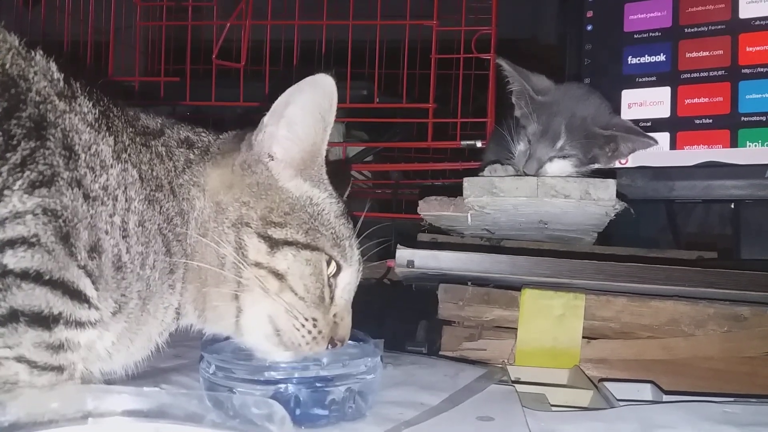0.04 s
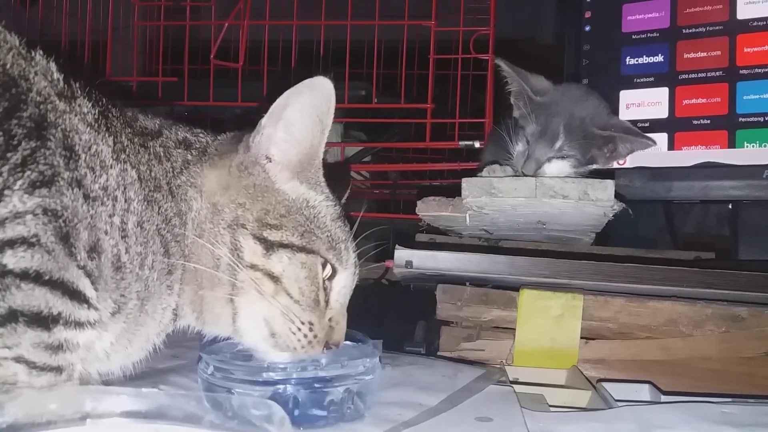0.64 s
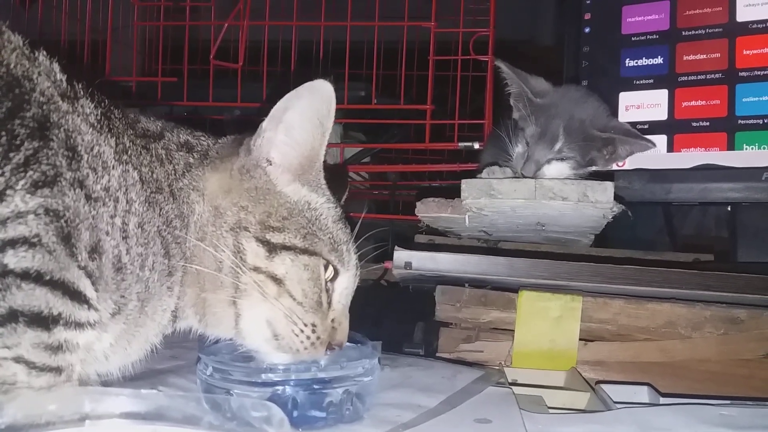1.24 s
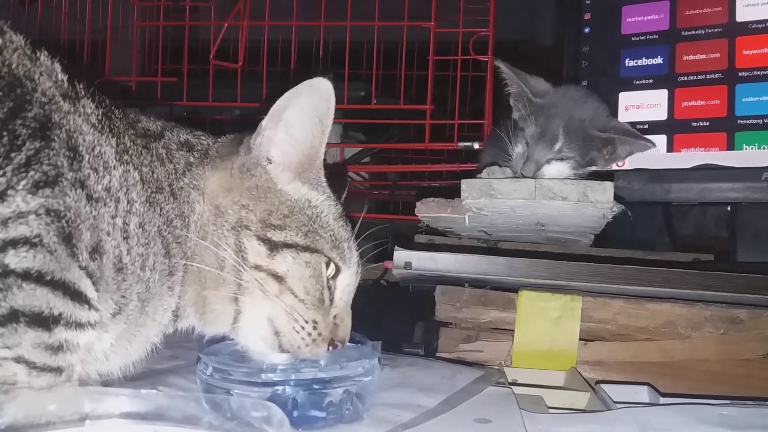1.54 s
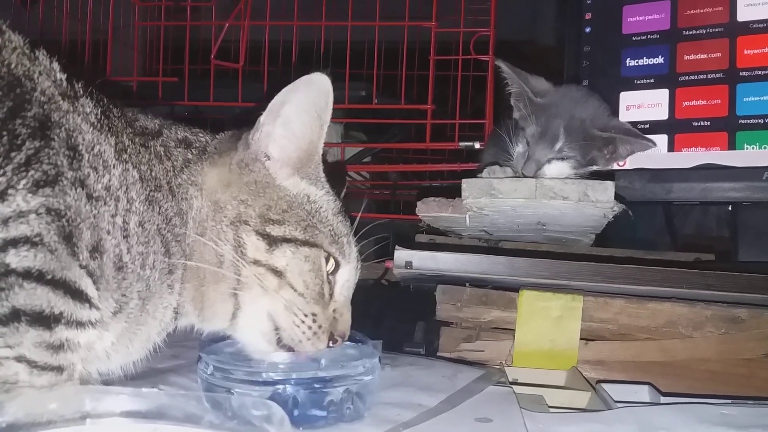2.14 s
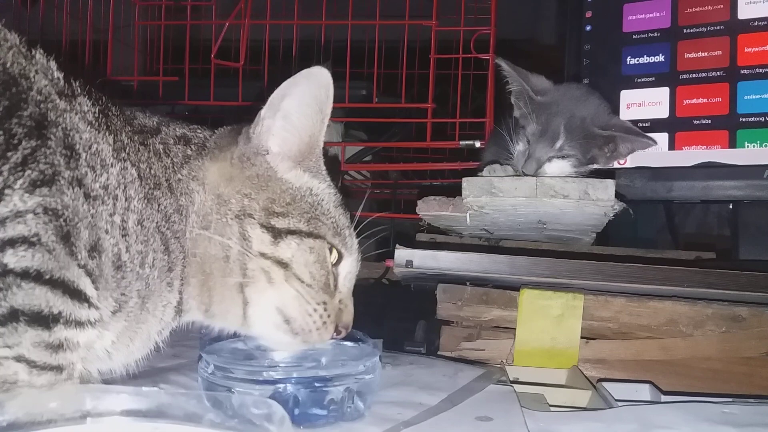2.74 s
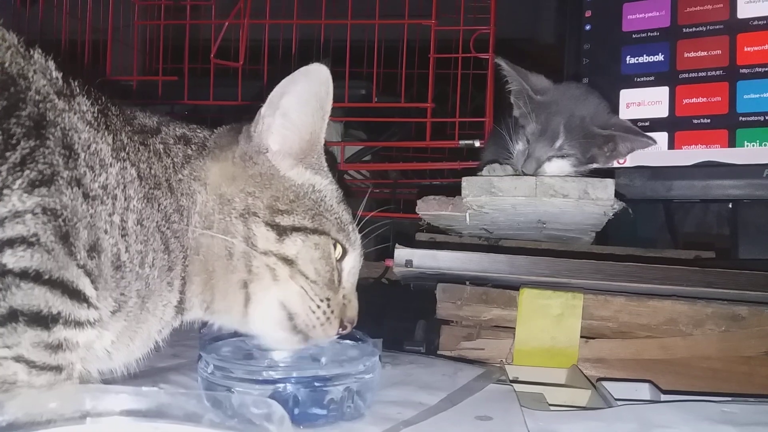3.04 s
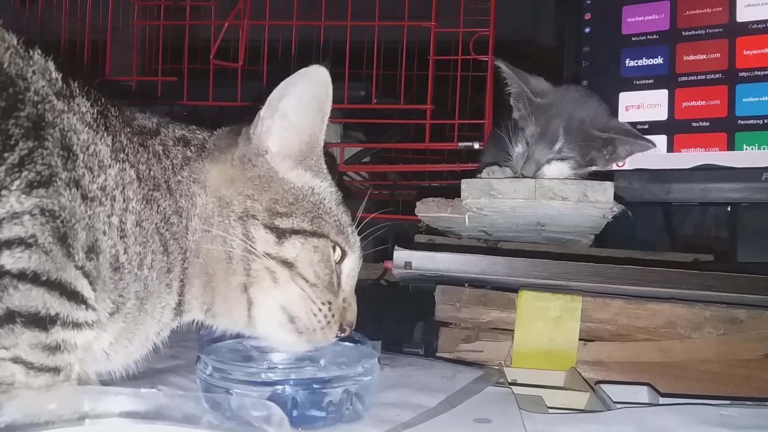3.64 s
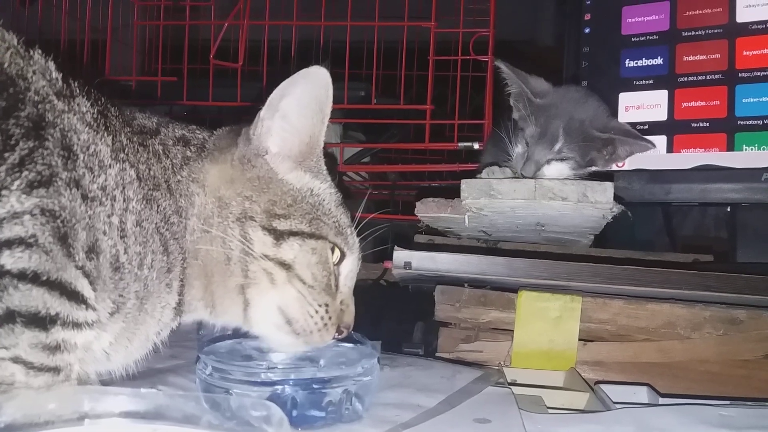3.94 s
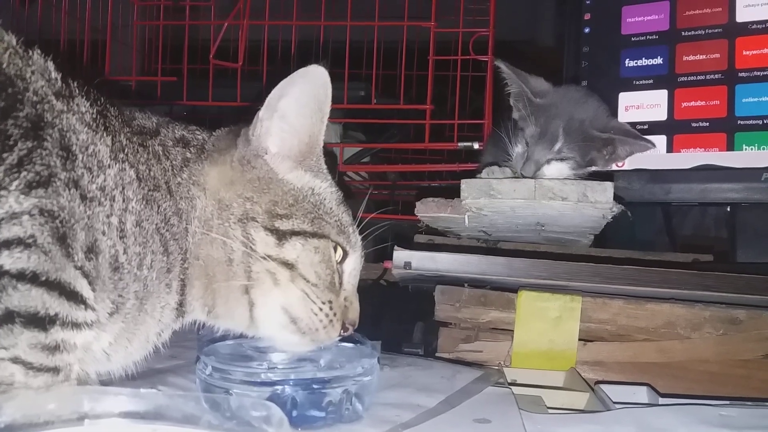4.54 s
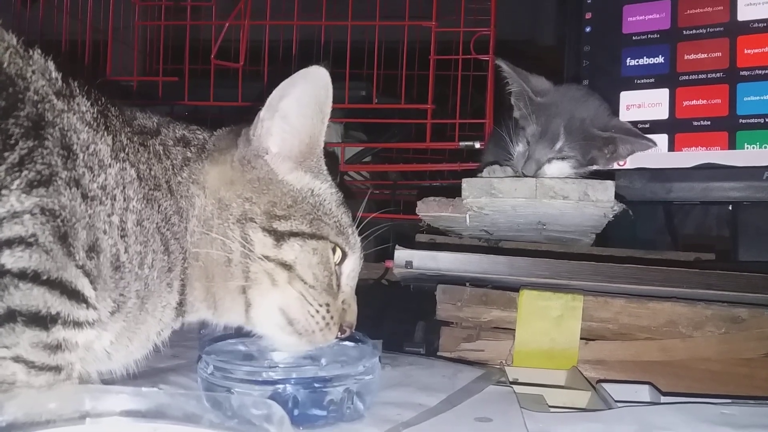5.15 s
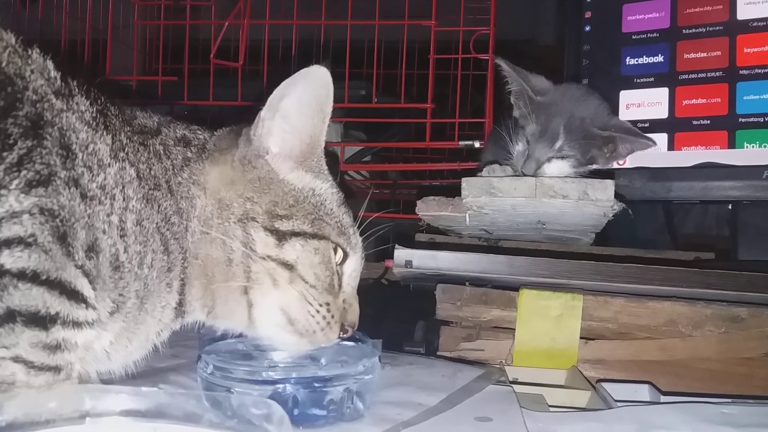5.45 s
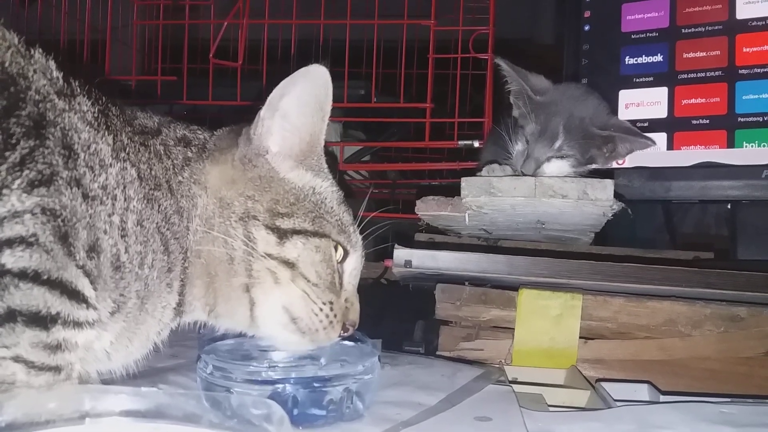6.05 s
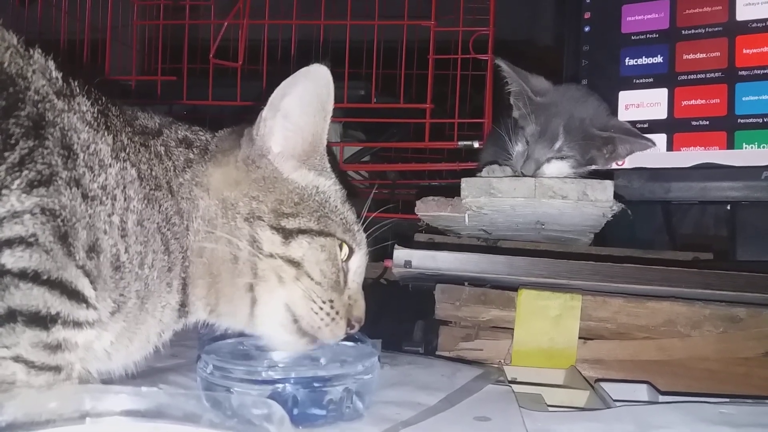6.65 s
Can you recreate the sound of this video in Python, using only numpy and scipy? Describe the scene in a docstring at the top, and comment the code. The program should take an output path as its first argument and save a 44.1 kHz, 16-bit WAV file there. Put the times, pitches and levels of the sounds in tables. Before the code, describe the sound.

A faint indoor bed of room tone, fan hum and thin high hiss runs throughout, with a single-cylinder motorbike far outside. Close to the microphone a cat laps water from a small bowl: a soft plop at 0.3 seconds, faint rustles and a tick until about 1.8, then a busier, uneven run of tongue plops, tiny bubble ticks and wet smacks from 2 to 4.6 seconds. Meanwhile the motorbike slowly revs up and approaches, its low throb growing from about 3 seconds. From 4.5 it takes over, the exhaust thudding, booming through the house and growling while tyre noise swells into a broad rush. A brief rustle comes near 5.3. The bike passes at about 5.7 seconds; the rush then eases while the exhaust stays loud to the end, near 6.8. Sharper wet laps cut through at 6 and 6.7 seconds.

```python
"""A faint bed of room tone, fan hum and thin high hiss, with a single-cylinder motorbike far outside.
Up close a cat starts lapping from a small bowl: the tongue plops on the water, tiny bubbles tick,
soft rustles brush by and the wet tongue smacks off the palate. The bike revs up and passes near 5.7 s:
its exhaust firings thud, boom through the house and bark, while its tyres swell to a rush."""
import sys
import numpy as np
from scipy import signal
from scipy.fft import rfft, irfft, next_fast_len
from scipy.io import wavfile
from scipy.ndimage import uniform_filter1d

SR = 44100
rng = np.random.default_rng(int(sys.argv[2]) if len(sys.argv) > 2 else 0)


def persist_wave(psi):
    """Save psi, clipped to +-1, as 16-bit WAV."""
    counts = np.round(np.clip(psi, -1, 1) * 32767).astype(np.int16)
    wavfile.write(sys.argv[1], SR, np.atleast_2d(counts).T)


N = 299439
TIME = np.arange(N) / SR

# Table levels are relative: each layer sets its own gain on top.
# EQ of the room tone: f/Hz, level/dB
ROOM_EQ = [(30, -24), (60, -1), (100, 5), (220, 11), (300, 4), (450, -5.5), (700, -4), (1200, -18.5),
           (2200, -14.5), (2900, -30), (4600, -33), (5800, -24.5), (8500, -32), (12000, -27),
           (15500, -25.5)]
# partials of the fan: f/Hz, level/dB
FAN_HUM = [(96, -64), (287, -61.5), (383, -67.5), (624, -73)]
# EQ of the thin hiss: f/Hz, level/dB
HISS_EQ = [(5600, -36), (6400, -8), (6750, 5), (6950, 8.5), (7150, 3), (7450, -8.5), (7900, -41)]

# the revs climb, then hold: t/s, firing rate/Hz
FIRING_RATE = [(0.0, 35.9), (0.07, 35.03), (0.91, 36.12), (1.78, 38.37), (3.7, 40.69), (3.97, 40.16),
               (4.25, 41.58), (5.16, 41.66), (5.29, 40.87), (6.79, 41.04)]
# partials of the low thud: multiple of the firing rate, level/dB
THUD_PARTIALS = [(1, -18), (2, -0.5), (3, -4)]
# fader ride of the thud: t/s, level/dB
THUD_RIDE = [(0.0, -62), (0.07, -64.5), (3.33, -54), (3.5, -55), (4.1, -46.5), (4.37, -57), (4.56, -42.5),
             (4.9, -45), (5.11, -34.5), (5.88, -42.5), (6.31, -33.5), (6.79, -46.5)]
# fader ride of the indoor boom: t/s, level/dB
BOOM_RIDE = [(0.0, -59.5), (0.64, -47), (2.89, -55.5), (2.99, -40), (3.1, -52.5), (3.44, -39), (3.69, -51),
             (3.76, -36), (3.82, -43.5), (4.16, -36.5), (4.23, -42), (4.65, -32.5), (4.82, -39.5),
             (4.93, -29), (5.09, -25), (5.56, -28.5), (5.8, -22), (5.98, -31.5), (6.05, -22), (6.39, -27.5),
             (6.66, -23.5), (6.79, -26)]
# fader ride of the bark: t/s, level/dB
BARK_RIDE = [(0.1, -60.5), (2.45, -50.5), (2.82, -45.5), (4.09, -46.5), (4.66, -36.5), (5.21, -34.5),
             (5.43, -26.5), (5.5, -32), (6.04, -24.5), (6.7, -25.5)]
# partials of the bark: multiple of the firing rate, level/dB approaching, level/dB with the pipe facing
BARK_PARTIALS = [(6, 0, -9), (7, -4.5, -4.5), (8, -3, -8), (9, -1.5, 1), (10, -2, 1), (11, 3, 0.5),
                 (12, -1.5, 1), (13, -6, -6), (14, -3, -11.5), (15, -27, -13.5), (16, -11, -26),
                 (17, -14, -21), (18, -25, -38), (19, -27, -23.5), (20, -18, -36)]
# the pipe swings round to face the house: t/s, share/0-1
PIPE_FACING = [(5.3, 0.1), (6.1, 1)]
# ring of one firing in the pipe: f/Hz, level/dB
PIPE_EQ = [(40, -27), (75, -18), (120, -13), (190, 3), (260, -5.5), (350, 0), (470, 2.5), (570, -1.5),
           (720, -8.5), (900, -14), (1500, -30)]
# body of the tyre rush: f/Hz, level/dB
RUSH_BODY_EQ = [(35, -5), (60, 0), (110, 11.5), (600, -4), (950, -2.5), (1300, .5), (1550, -0.5), (1870, 1),
                (2650, -5.5), (3200, -4), (3700, -9), (4500, -27)]
# treble of the tyre rush: f/Hz, level/dB
RUSH_TREBLE_EQ = [(2900, -3.5), (3300, -1.5), (3900, -2), (4450, 1), (5200, -3), (5900, -6.5), (6900, -5),
                  (7800, -19.5), (9500, -19), (12500, -21.5), (15500, -28)]

# the tongue meets the water: t/s, level/dB
PLOP_CUES = [(0.314, -39.5), (1.984, -40.5), (2.253, -44.5), (2.936, -43.5), (2.948, -44), (3.363, -36),
             (4.067, -44), (6.042, -33), (6.714, -29.5)]
# the mouth and the dent in the water ring: f/Hz, t60/s, level/dB
PLOP_RING = [(920.4, 0.0091, 12), (1310, 0.012, 1.5), (1790, 0.017, 1)]
# tiny bubbles burst at the lips: t/s, level/dB, f/Hz
TICK_CUES = [(0.3137, -45, 5440), (1.3064, -46, 4360), (1.9205, -50, 4430), (2.174, -37.5, 4770),
             (2.2081, -49, 5010), (2.2892, -42, 4776), (2.7995, -40, 4860), (2.839, -42, 5000),
             (3.054, -47, 3950), (3.1448, -47, 4600), (3.1767, -48, 4910), (3.6107, -45, 4907),
             (3.6596, -43, 4975), (3.921, -34.5, 4420), (3.9263, -39, 3920), (4.2201, -38, 4690),
             (4.5816, -37, 4978), (6.0414, -29, 4070), (6.7346, -37, 4910)]
# soft rustles: centre t/s, half length/s, level/dB
RUSTLE_CUES = [(0.378, 0.021, -61), (0.61, .03, -65), (1.16, 0.051, -57), (1.271, 0.059, -61),
               (1.595, 0.029, -54.5), (1.679, 0.059, -62), (1.787, 0.056, -60.5), (5.34, 0.14, -41.5),
               (5.63, .035, -43), (6.16, 0.038, -52)]
# the wet tongue peels off the palate: centre t/s, half length/s, level/dB, f/Hz
SMACK_CUES = [(2.025, 0.013, -56.5, 4500), (2.26, .012, -57, 4600), (2.294, 0.019, -47.5, 4830),
              (2.509, 0.011, -56.5, 4600), (2.553, 0.028, -51.5, 4760), (2.764, .005, -55, 4960),
              (2.79, 0.024, -54, 4900), (3.407, 0.026, -58, 4900), (3.66, 0.0072, -56, 4983),
              (3.932, 0.0046, -49.5, 4144), (6.742, 0.029, -47.5, 4930)]
# fine spray fizzes: centre t/s, half length/s, level/dB
FIZZ_CUES = [(2.475, 0.014, -65), (3.416, .006, -65)]

PASS_S, SPEED_M_S, ROAD_M = 5.734, 10.25, 9.04  # the pass-by: closest moment, speed, distance to the road


def undb(db):
    """Decibels to gain."""
    return 10 ** (np.asarray(db) / 20)


def unit(x):
    """Scale to rms 1."""
    return x / np.sqrt(np.mean(x ** 2))


def curve(table):
    """An automation lane: straight lines between (t/s, value) points."""
    return np.interp(TIME, *np.transpose(table))


def colour(x, eq):
    """Apply an EQ of (f/Hz, level/dB) points that rolls off past its ends; rms 1."""
    hz, db = np.transpose(eq)
    size = next_fast_len(N)
    octave = np.log2(np.maximum(np.arange(size // 2 + 1) * SR / size, 1))
    outside = np.abs(octave - np.clip(octave, np.log2(hz[0]), np.log2(hz[-1])))
    gain = undb(np.interp(octave, np.log2(hz), db) - 20 * outside)
    return unit(irfft(rfft(x, size) * gain, size)[:N])


def band(x, lo_hz, hi_hz, order):
    """Causal band-pass."""
    return signal.sosfilt(signal.butter(order, [lo_hz, hi_hz], "band", fs=SR, output="sos"), x)


def noise():
    """White noise."""
    return rng.standard_normal(N)


def walk(rate_hz):
    """Smooth random modulation; rms 1."""
    hold = int(SR / rate_hz)
    steps = np.repeat(rng.standard_normal(N // hold + 2), hold)
    return unit(uniform_filter1d(uniform_filter1d(steps, hold), hold)[:N])


def crackle(per_s, spread_db=4):
    """Dense clicks of unequal size."""
    clicks = (rng.random(N) < per_s / SR) * rng.choice([-1, 1], N)
    return clicks * undb(spread_db * np.minimum(rng.exponential(size=N), 2))


def swell(centre_s, half_s):
    """A bell-shaped fade in and out."""
    return np.exp(-np.minimum(((TIME - centre_s) / half_s) ** 2, 40))


def harmonic(turns, multiple, echo, drift_rad=2.12):
    """One partial of a turning machine plus its echo off the walls, drifting in phase; rms 1."""
    phase = 2 * np.pi * (multiple * turns + rng.random()) + .35 * walk(6)
    detour = 2 * np.pi * rng.random() + drift_rad * walk(7)
    return unit(np.sin(phase) + echo * np.sin(phase + detour))


def room():
    """The bed: gently wavering room tone, a fan's hum and a steady narrow hiss."""
    hum = sum(undb(db) * harmonic(TIME, hz, echo=0.37) for hz, db in FAN_HUM)
    tone = undb(-53) * colour(noise(), ROOM_EQ) * undb(.5 * walk(5.26))
    hiss = undb(-62) * colour(noise(), HISS_EQ)
    return tone + hum + hiss


def distance_db(db_per_decade=35.5):
    """The bike's level against its closest point on a straight road; houses screen it, so it falls fast."""
    metres = np.hypot(SPEED_M_S * (TIME - PASS_S), ROAD_M)
    return -db_per_decade * np.log10(metres / ROAD_M)


def exhaust(street_t60_s=0.8):
    """Firings stack into a low thud, a boom and a bark; their unevenness rattles round the street."""
    firing_hz = curve(FIRING_RATE) * (1 + .005 * walk(25) + .003 * walk(5))
    turns = np.cumsum(firing_hz) / SR
    thud = unit(sum(undb(db) * harmonic(turns, k, echo=0.26) for k, db in THUD_PARTIALS))
    # each firing hits a little harder or softer, which fills the gaps between harmonics
    uneven = np.diff(np.floor(turns), prepend=0) * np.sign(noise())
    street_reverb = noise()[:SR] * undb(-60 * TIME[:SR] / street_t60_s)
    rattle = colour(signal.fftconvolve(uneven, street_reverb)[:N], PIPE_EQ)
    return (undb(curve(THUD_RIDE) - 1.5) * thud
            + undb(curve(BOOM_RIDE) - 0.5) * boom(turns)
            + undb(curve(BARK_RIDE) - 1.5) * bark(turns)
            + undb(distance_db() - 34.5) * rattle)


def boom(turns, sweep_s=0.71, fifth_leads_s=4.98, swing_db=7, throb_db=2):
    """Standing waves sweep the room as the bike moves: throbbing 4th and 5th harmonics trade the lead."""
    sweep = np.cos(2 * np.pi * (TIME - fifth_leads_s) / sweep_s)
    balance = undb(3 + 0.73 * distance_db() - swing_db * sweep)  # the 4th comes up as the bike nears
    fourth, fifth = (harmonic(turns, k, echo=.3) * undb(throb_db * walk(11)) for k in (4, 5))
    return (balance * fourth + fifth) / np.hypot(balance, 1)


def bark(turns, growl_db=4.5, growl_multiple=6.9):
    """Harmonics 6 to 20 change colour as the pipe swings round; the low ones growl as the bike passes."""
    facing = curve(PIPE_FACING)
    abreast = swell(centre_s=5.63, half_s=0.78)
    out = 0
    for k, approach_db, facing_db in BARK_PARTIALS:
        boost_db = growl_db * abreast * np.exp(-(k - growl_multiple) ** 2 / 2)
        level_db = approach_db + (facing_db - approach_db) * facing + boost_db
        # shorter waves feel the changing echo path more, so the top partials waver and break up
        out += undb(level_db) * harmonic(turns, k, echo=.9, drift_rad=.17 * k)
    return unit(out)


def tyres(closest_db=-41.5, far_traffic_db=-67.5, forward_db=1.5):
    """Grainy road rush swells out of far traffic and brightens as it nears, throwing its treble ahead."""
    near_db = distance_db()
    ahead = np.sin(np.arctan(SPEED_M_S * (PASS_S - TIME) / ROAD_M))
    body = colour(noise(), RUSH_BODY_EQ) * undb(.5 + .5 * walk(22.05))
    treble_db = -3 + 0.21 * near_db + forward_db * ahead
    treble = colour(noise(), RUSH_TREBLE_EQ) * undb(treble_db + .5 * walk(25))
    return np.hypot(undb(closest_db + near_db), undb(far_traffic_db)) * (body + treble)


def plops(trim_db=2):
    """The tongue tip strikes the water: a short hollow ring, tuned a little differently each time."""
    out = np.zeros(N + SR)
    t = TIME[:SR // 20]
    for start_s, db in PLOP_CUES:
        detunes = 1 + 0.085 * rng.standard_normal(len(PLOP_RING))
        ring = sum(undb(mode_db - 60 * t / t60) * np.sin(2 * np.pi * hz * detune * t)
                   for (hz, t60, mode_db), detune in zip(PLOP_RING, detunes))
        ring = band(ring, 780, 2400, order=3)
        out[int(start_s * SR):][:len(t)] += undb(db + trim_db) * ring / np.abs(ring).max()
    return out[:N]


def bubble(hz, attack_cycles):
    """A tiny bubble's ping swells and rings out; peak near 1."""
    cycles = TIME[:SR // 20] * hz
    envelope = cycles / attack_cycles * np.exp(1 - cycles / attack_cycles)
    return envelope * np.sin(2 * np.pi * cycles)


def ticks(trim_db=2.5, splash_db=-18, splash_t60_s=0.045, plop_bubble_hz=4300):
    """Single bubbles burst with a tiny splash for a tail, at the lips and on every plop."""
    out = np.zeros(N + SR)
    t = TIME[:SR // 20]
    plop_bubbles = [(start_s, db - 10, plop_bubble_hz) for start_s, db in PLOP_CUES]
    for start_s, db, hz in list(TICK_CUES) + plop_bubbles:
        splash = unit(band(rng.standard_normal(len(t)), 3700, 6500, order=6))
        tick = bubble(hz, attack_cycles=1.3) + splash * undb(splash_db - 60 * t / splash_t60_s)
        out[int(start_s * SR):][:len(t)] += undb(db + trim_db) * tick
    return band(out[:N], 3150, 7000, order=4)


def rustles():
    """Brief soft brushing with a very fine grain."""
    eq = [(700, -4), (1800, 4), (3000, -0.5), (4500, 0.5), (6800, -6), (8000, -17), (14000, -19)]
    brush = colour(crackle(per_s=14000, spread_db=3), eq)
    return brush * sum(undb(db) * swell(centre_s, half_s) for centre_s, half_s, db in RUSTLE_CUES)


def smacks(mouth_db=-12, wet_db=-12):
    """A water film tears into bubbles of nearly one pitch and rings the mouth; some laps add a fizz."""
    tearing = crackle(per_s=1100)
    mouth = undb(mouth_db) * unit(band(tearing, 1700, 2180, order=3))
    wet_sheen = undb(wet_db) * unit(band(tearing, 5500, 6717.4, order=5))
    bursts = [crackle(per_s=450) for _ in range(3)]
    out = 0
    for centre_s, half_s, db, hz in SMACK_CUES:
        froth = sum(signal.oaconvolve(clicks, bubble(hz * detune, attack_cycles=2.6))[:N]
                    for clicks, detune in zip(bursts, (.92, 1, 1.05)))
        out += undb(db) * swell(centre_s, half_s) * (unit(froth) + mouth + wet_sheen)
    spray = unit(band(crackle(per_s=2000), 8800, 13500, order=3))
    return out + spray * sum(undb(db) * swell(centre_s, half_s) for centre_s, half_s, db in FIZZ_CUES)


def scene():
    """The mono mix: the cat up close, the bike outside, the room underneath."""
    cat = plops() + ticks() + smacks() + rustles()
    bike = exhaust() + tyres()
    return (cat + bike + room())[None]


def record(dry, fade_s=.004, top_hz=15750):
    """A quick fade-in and a phone's steep high cut."""
    fade_in = np.minimum(TIME / fade_s, 1)
    high_cut = signal.ellip(10, .1, 80, top_hz, fs=SR, output="sos")
    return signal.sosfilt(high_cut, dry * fade_in)


dry = scene()
out = record(dry)
persist_wave(out)
```